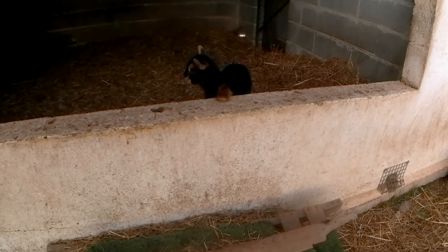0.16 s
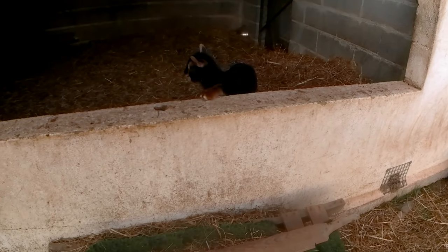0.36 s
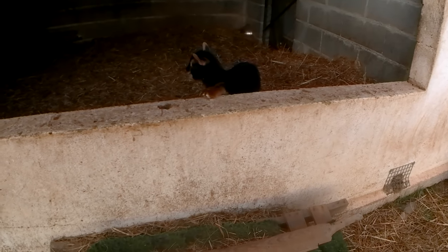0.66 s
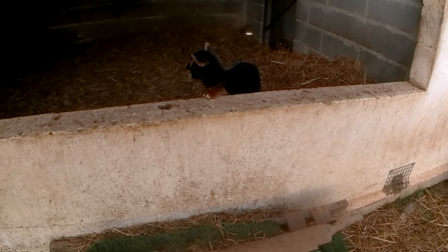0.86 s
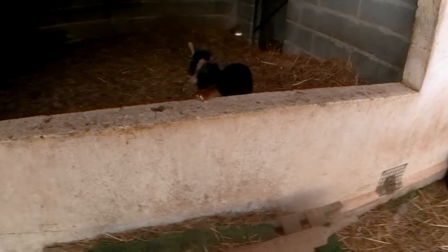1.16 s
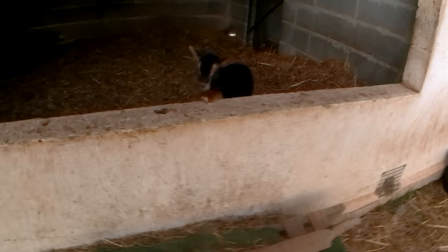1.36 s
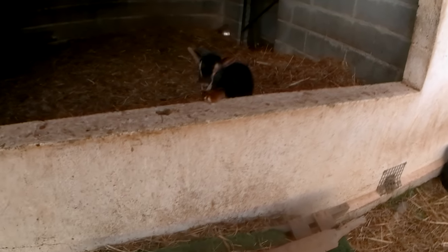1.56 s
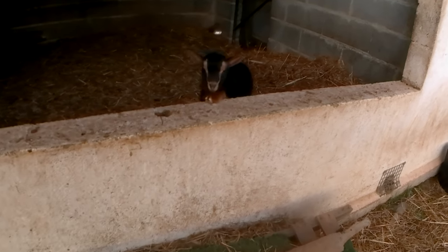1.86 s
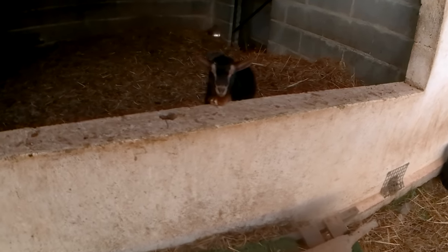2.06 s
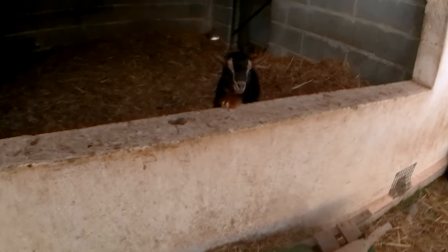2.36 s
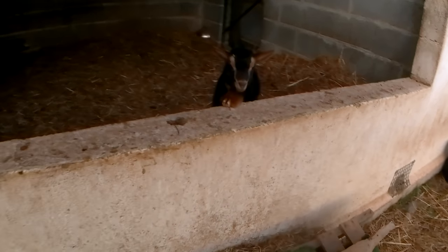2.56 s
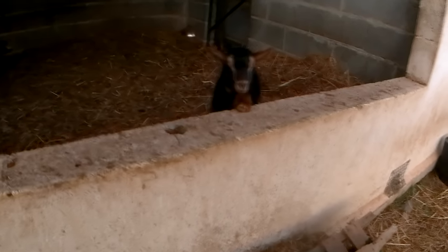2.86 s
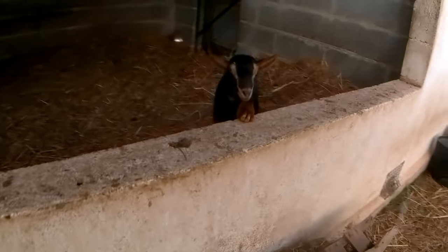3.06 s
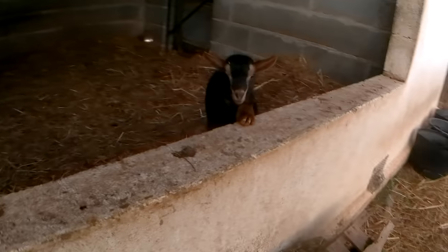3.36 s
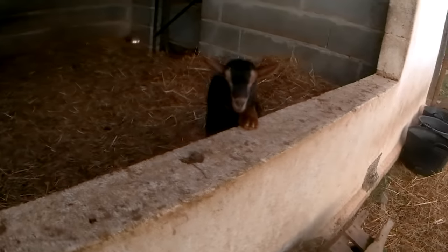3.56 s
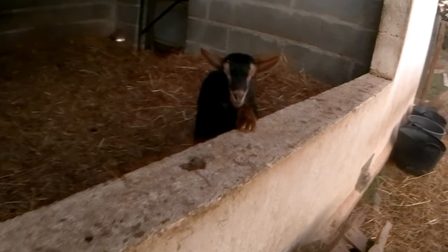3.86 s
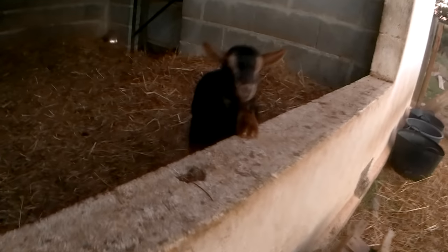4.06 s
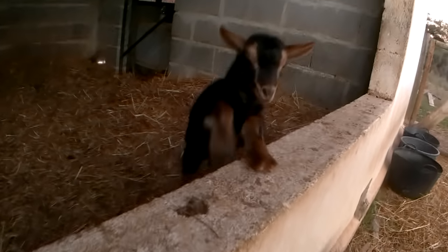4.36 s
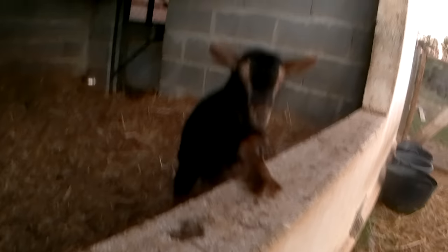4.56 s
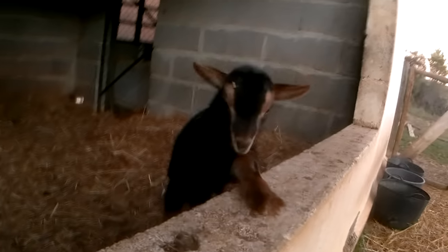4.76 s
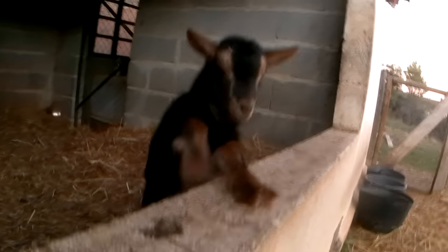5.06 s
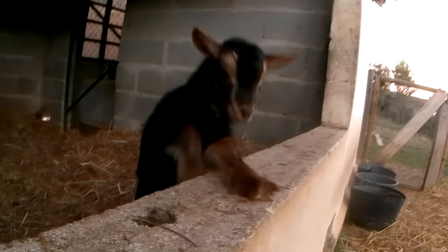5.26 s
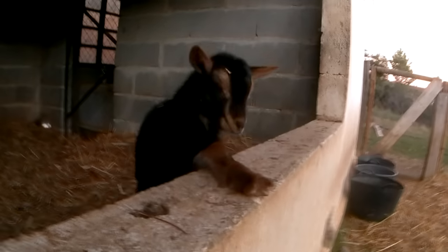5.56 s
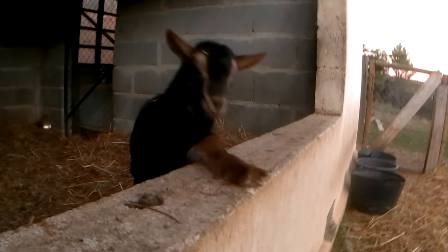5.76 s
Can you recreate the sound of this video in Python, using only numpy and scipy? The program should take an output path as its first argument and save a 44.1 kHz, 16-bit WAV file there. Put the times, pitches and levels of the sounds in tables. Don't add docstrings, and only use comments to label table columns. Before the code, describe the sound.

A goat kid moves about a straw-bedded block pen, its dull sheet-metal neck bell clanking loosely while hooves knock hollowly. One short, quavering bleat comes near two seconds. After a sparser stretch, the bell clatters densely and loudest around four seconds as hooves slide on the wall top, then continues more loosely. Low handling bumps and rumble sit close to a dull, slightly overloaded microphone.

```python
import sys
import numpy as np
from scipy import signal
from scipy.io import wavfile
from scipy.ndimage import uniform_filter1d, minimum_filter1d

SR = 44100
rng = np.random.default_rng(int(sys.argv[2]) if len(sys.argv) > 2 else 0)


def makeup_ratio(level_db):
    decades = np.asarray(level_db, float) / 20
    return 10 ** decades


def master_out(mix):
    frames = np.transpose(np.atleast_2d(mix))
    ceiling = np.clip(frames, -1, 1)
    pcm = np.round(ceiling * 32767).astype(np.int16)
    wavfile.write(sys.argv[1], SR, pcm)


N = 261072

# (time [s], steps and hands near the microphone [dB], stirring in the straw [dB])
MOVEMENT = [(0, 0, -2), (.45, 2, -1.2), (.9, 3.5, -9.5), (1.2, 5.5, -5.5), (1.45, 2.5, 0), (1.75, 3, -3.5),
            (2.1, -5.5, 6.5), (2.3, 4, 9.5), (2.55, 3, -1.5), (3.0, 0.5, -2), (3.3, -1.3, 1), (3.75, 2, 3),
            (4.0, 1, 12.5), (4.3, -2, 9.5), (4.9, 0, 1), (5.35, 7, -0.5), (5.65, 1, -0.5), (5.92, 3, 1.5)]
# (frequency [Hz], density [dB per Hz])
RUMBLE_SPECTRUM = [(18, 4), (45, -2), (80, -3), (130, -8), (200, -13.5)]
SHUFFLE_SPECTRUM = [(130, -3), (250, -2), (500, -8), (900, -10.5), (1300, -16.5), (1800, -22.5)]
STRAW_SPECTRUM = [(900, 1), (1300, 5), (1700, -4.5), (2200, -2), (2700, -1.5), (3100, -23.5), (3400, -26)]
FINE_STRAW_SPECTRUM = [(2900, -12.5), (3500, -1), (4100, -3.5), (4700, -8.5), (5200, -10), (6200, -15),
                       (7400, -29.5)]
RUMBLE_DB, SHUFFLE_DB, STRAW_DB, FINE_DB = -34, -36.5, -43, -58
RUMBLE_FOLLOWS, FINE_FOLLOWS = 0.56, 0.6

# (time [s], peak [dB], t60 [s])
THUDS_NEAR_MIC = [(.37, -48, 0.031), (0.275, -5, 0.0087), (.576, -38, 0.29), (0.65, -26, 0.088),
                  (0.943, -37.5, 0.18), (.957, -24, 0.03), (1.286, -24, 0.12), (1.461, -27, 0.099),
                  (1.837, -27.5, 0.11), (2.53, -35, 0.1), (2.545, -25.5, 0.046), (3.13, -27, 0.066),
                  (3.401, -30.5, 0.065), (5.03, -25, 0.052), (5.587, -23.5, 0.082), (5.616, -33, 0.047),
                  (5.819, -13, 0.013)]
THUD_HZ, THUD_HZ_PER_S = 54, 76

# (time [s], peak [dB], brightness [dB], t60 [s])
STALK_SNAPS = [(0.287, -32.5, -4.5, 0.029), (0.3006, -30, -3.5, 0.013), (0.307, -38, -5, 0.03),
               (2.72, -35, -7.5, 0.017), (0.4007, -43.5, -1, 0.01), (1.3745, -48, -29, 0.066),
               (3.4332, -42, -38, 0.12), (4.661, -39, -14, 0.023), (4.7616, -59, -20.5, 0.036),
               (5.021, -37, -15.5, 0.017), (5.171, -22.5, -17, 0.0088)]
# (time [s], peak [dB], weight [dB], t60 [s])
HORN_SCUFFS = [(.437, -61, 9, 0.031), (0.5932, -44.5, -1.5, 0.054), (.6144, -54, 19, 0.11),
               (.8294, -57, 25.5, 0.039), (.976, -46, 9, 0.096), (1.0086, -52.5, 8, 0.21),
               (1.613, -40, 9, 0.036), (2.3485, -35, 8, 0.037), (2.642, -35, 5, 0.017),
               (2.718, -42, 7, 0.036), (2.7266, -36, 5.5, 0.11), (3.7716, -46, 16.5, 0.067),
               (5.8164, -39.5, 9.5, 0.027), (1.213, -48.5, 8, 0.068), (1.044, -48.5, 12, 0.041),
               (3.134, -53, 5, 0.053), (3.488, -46, 3, 0.029)]
STALK_WEIGHT_DB, SCUFF_BRIGHT_DB = 0.5, -34

# (time [s], length [s], level [dB])
HOOF_SLIDES = [
    (3.778, 0.31, -30),
    (4.244, 0.069, -31.5),
    (4.455, 0.042, -30),
]
# (frequency [Hz], density [dB per Hz])
GRIT_SPECTRUM = [(480, -5), (650, 11), (1100, 3), (1700, -14.5), (2200, -0.5), (2700, -2.5), (3300, -15),
                 (5400, -18.5), (7400, -48)]
SLIDE_GRIPS_DB_PER_S, SLIDE_FADES_DB_PER_S, SLIDE_START_DB = 131, 73.5, -8

# (time [s], peak [dB], pitch [Hz], t60 [s])
HOOF_KNOCKS = [(0.277, -20, 277, 0.021), (0.617, -12, 300, 0.082), (0.662, -4.5, 293, 0.024),
               (0.719, -18, 322, 0.083), (1.031, -10, 340, 0.036), (1.173, -18.5, 367, 0.11),
               (1.369, -20, 215, 0.024), (1.457, -6.5, 179, 0.048), (2.348, -19, 487, 0.26),
               (2.384, -21, 393, 0.14), (2.457, -16.5, 325, 0.056), (2.52, -22, 224, 0.075),
               (2.644, -14.5, 656, 0.058), (2.718, -9.5, 667, 0.07), (2.742, -10, 616, 0.037),
               (3.064, -7, 360, 0.016), (3.588, -12, 575, 0.037), (3.791, -27, 350, 0.061),
               (3.842, -21.5, 322, 0.18), (3.91, -32, 573, .2), (4.163, -17.5, 364, 0.12),
               (4.296, -22, 223, 0.29), (4.183, -19.5, 330, 0.1), (5.278, -12.5, 205, 0.039),
               (5.276, -9, 438, 0.096), (5.31, -17, 497, 0.13), (5.433, -25, 318, 0.11),
               (5.614, -20, 228, 0.074), (5.831, -16, 173, 0.13), (1.121, -22, 340, 0.035),
               (1.376, -22, 420, .04), (1.548, -22.5, 520, 0.085), (1.62, -22.5, 420, 0.067),
               (1.708, -22.5, 450, .06), (3.135, -29.5, 600, 0.086), (3.26, -27, 600, 0.094),
               (4.297, -21.5, 600, 0.072), (4.575, -25.5, 450, 0.044)]

# (middle [s], half length [s], level [dB])
CLAPPER_DRAGS = [
    (1.17, 0.054, -56.5),
    (2.5, 0.073, -56),
    (1.4, 0.04, -58),
    (0.062, 0.056, -57),
]
# (time [s], pitch [Hz], peak [dB], ring [s])
EDGE_GLINTS = [(.493, 5947, -56, .04), (.493, 4330, -49, .035), (.5, 5120, -60, .05),
               (.555, 4280, -56.5, .03), (.596, 5947, -63, .09), (.64, 3860, -57, .12),
               (3.772, 5947, -52, .02), (3.772, 4350, -52.5, .015), (3.83, 3790, -44.5, .045),
               (3.852, 4859, -43.5, .03), (3.856, 4340, -53.5, .025), (4.013, 5947, -40, .06),
               (4.07, 5900, -57, .075), (4.013, 4830, -38, .115), (3.668, 4859, -50.5, 0.066),
               (.8, 3800, -62, 0.11), (4.455, 3816, -48.5, 0.042), (4.215, 4360, -51, .045),
               (4.3, 4859, -49, .035), (4.52, 3760, -48.5, .1), (4.73, 3816, -55.5, .11),
               (5.698, 4350, -56, .04)]

# (time [s], peak [dB], pitch [Hz], beats with its twin [per s], ring [s])
FULL_BLOWS = [(.172, -7.5, 848.4, 13, 0.046), (.495, -5, 855, 10, 0.064), (.592, -12, 808, 37.5, 0.1),
              (.788, -16.5, 843, 24, 0.078), (1.09, -27, 852, 9.5, 0.21), (1.214, -16.5, 852, -6, 0.053),
              (1.568, -23.5, 838.5, 3.5, 0.048), (1.716, -17.5, 874, 30, 0.061),
              (2.422, -23, 865, -27, 0.051), (3.047, -17, 837, -2, 0.044), (3.533, -5.5, 827, 37.5, 0.067),
              (3.666, -4.5, 843, 28.5, 0.018), (3.777, -2, 833, 8.5, 0.078), (3.869, 0, 858, 10, 0.018),
              (4.017, 0.5, 852, 42, 0.05), (4.283, -5, 844, 16.5, 0.023), (4.451, -2.5, 843.5, 16, 0.016),
              (4.728, -9, 844, -4, 0.073), (4.825, -5, 834, 44, 0.066), (5.106, -13, 848.6, 24.5, 0.11),
              (5.219, -5, 869, 24.5, 0.019), (5.701, -8, 869, -24, 0.031)]
# (time [s], peak [dB], pitch [Hz], beats [per s], ring [s])
GLANCING_TOUCHES = [(.05, -34, 840, 5, 0.043), (0.078, -15.5, 850, -4, 0.042), (.22, -22, 846.4, 5, 0.047),
                    (.316, -24, 846, 31.5, 0.072), (.535, -1.5, 851.5, 6, 0.038),
                    (.612, -8.5, 843.7, -9, 0.048), (.664, -12, 852.5, 13.5, 0.035),
                    (0.713, -14, 843, 20.5, 0.045), (.82, -20, 857, 5, 0.058),
                    (.897, -22.5, 844, 16.5, 0.089), (1.312, -19, 848.6, 16.5, 0.075),
                    (1.872, -20, 876, -36, 0.027), (2.871, -27.5, 842, 5, 0.063),
                    (3.349, -17.5, 841.4, 17.5, 0.068), (3.684, -4, 830, 10.5, 0.011),
                    (3.713, -6.5, 830, 8, 0.026), (3.889, -2, 854, 11, 0.024), (3.921, -24, 845, 22, 0.016),
                    (3.946, -9, 849, 18, 0.072), (4.055, -6.5, 856, 8, 0.022), (4.09, -5, 844.3, 42, 0.066),
                    (4.302, -7.5, 867, 18, 0.024), (4.221, -4.5, 841.6, 40, 0.054),
                    (4.176, -18.5, 839, 12, 0.027), (4.332, -24, 860, 2.5, .07),
                    (4.51, -22, 870, 4, 0.0088), (4.479, -7.5, 851, -6.5, 0.029),
                    (4.535, -12.5, 830, 16.5, 0.034), (4.595, -14.5, 829, -2.5, 0.021),
                    (4.886, -17, 876, 11, 0.013), (4.912, -21.5, 849, 22, 0.065),
                    (4.98, -18.5, 839, 17, 0.04), (5.07, -17, 838, 28.5, 0.1), (5.287, -10, 855, 13, 0.038),
                    (5.329, -9, 850.3, 10, 0.034), (5.39, -20, 851, 29, 0.08)]
# (time [s], rise [s])
DRAGGED_BLOWS = [(.082, 0.0039), (1.214, 0.003), (3.534, 0.0049), (3.778, 0.018), (4.017, 0.0055),
                 (3.869, .007), (3.047, .007), (3.349, 0.0051), (4.283, 0.0032), (4.48, 0.011),
                 (4.728, 0.0056), (4.825, 0.0094), (5.222, 0.0092), (.535, 0.019), (.612, 0.0073),
                 (3.712, 0.0083), (3.946, 0.011), (5.33, 0.0066), (.712, 0.0092)]
# (time [s], peak [dB], lean to one of two rim modes [dB], hardness [dB], freedom from the coat [0-1])
UPPER_BLOWS = [(.172, -50.5, -2, -16, 0.7), (.492, -31, -15.5, -18.5, 0.83), (.612, -49, -8, -24.5, 0.4),
               (.636, -47, -2, -24, 0.7), (.7851, -44, -10, -34, 0.84), (1.075, -51, -10, -25, 0.94),
               (1.2141, -44, -5.5, -15.5, 0.07), (1.5559, -47, -20, -17, .9), (1.715, -40, -32, -40, 0.4),
               (2.4159, -48, -18, -29, 0.74), (3.0484, -46.5, -7, -41.5, .95),
               (3.5334, -35.5, -15, -20, 0.37), (3.6674, -44, -4.5, -8.5, 0.6),
               (3.772, -27.5, -12.5, -22.5, 0.3), (3.8744, -35, -5.5, -3, 0.5),
               (4.014, -30.5, 0, -5.5, 0.57), (4.136, -38, 19, -24, 0.8), (4.2824, -37.5, 5, -12, 0.06),
               (4.446, -33.5, 6.5, -19, 0.49), (4.726, -37.5, 13.5, -16.5, 0.06),
               (4.8234, -39.5, 1, -31, 0.3), (5.1054, -44.5, 7, -28, 0.07), (5.216, -42.5, -3.5, -15, 0.7),
               (5.293, -44.5, -2.5, -16.5, 0.8), (5.6984, -35, 8, -11, 0.14)]
# (pitch [Hz], family [index], level [dB])
UPPER_MODES = [
    (1983, 0, 0),
    (2174, 1, 3),
    (3779, 4, 2),
    (3816, 5, 2),
    (4859, 3, 0),
]
CROWN_DB, CROWN_PER_LEAN = -12.5, 1.5
SHOULDER_EVEN_DB = -11
TWIN_SHARE_PER_BEAT = 0.012
TWIN_FADES_S = 0.038
TWINS_AGREE_S = 0.0088

# (time [s], pitch [Hz], level [dB])
BLEAT_LINE = [
    (1.795, 353.6, -43),
    (1.818, 424, -23.5),
    (1.848, 581.3, -29.5),
    (1.955, 578, -23.5),
    (2.05, 583, -14),
    (2.24, 601.6, -11.5),
    (2.273, 528, -19),
    (2.3, 407, -18),
    (2.322, 373, -45),
]
# (time [s], half length [s], depth [0-1])
VOICE_CATCHES = [
    (2.0675, .002, .95),
    (2.0885, .0015, .9),
    (2.162, .003, .75),
    (2.195, .002, .85),
    (2.272, .003, .5),
]
# (frequency [Hz], width [Hz], level [dB])
NOSE_MODES = [(487, 380, 3), (1130, 310, -4.5), (2390, 170, -13.5), (2910, 250, -27), (4150, 280, -25.5),
              (6520, 2500, -34.5)]
MOUTH_MODES = [(1216, 350, 4.5), (2330, 490, -18.5), (3610, 520, -31.5), (4620, 400, -26.5),
               (6060, 980, -38)]
LIPS_PART, MOUTH_OPENS_S, MOUTH_TAKES_S = 0.073, 1.972, 0.0096
QUAVER_HZ, QUAVER_TOP_S, QUAVER_CALMS_S = 11.4, 2.036, 2.11
QUAVER_DEPTH_HZ, QUAVER_DB = 20.9, 3.5
PUSH_LAGS_S = 0.007

# (delay [s], level [dB])
WALL_ECHOES = [(.011, -8.5), (.023, -6.5), (.037, -13.5), (.058, -20.5), (0.082, -23.5)]
# (middle [s], half length [s], above [Hz])
TREBLE_DIPS = [
    (.278, .008, 3000),
    (.457, .011, 4600),
    (.486, .005, 4600),
    (.586, .006, 5500),
    (1.85, .006, 2800),
    (1.894, .006, 4600),
    (3.763, .007, 4600),
    (3.867, .005, 5300),
    (4.12, .009, 3200),
    (4.518, .005, 3000),
]
KNEE, HEADROOM = 0.46, 0.34
OFFSET, SQUEEZE_FROM_DB = -0.27, -10.5
BEND = 0.058
HISS_DB = -87


def in_time(rows):
    s, *columns = np.transpose(rows)
    return [np.interp(np.arange(N) / SR, s, c) for c in columns]


def rms_one(x):
    return x / np.sqrt(np.mean(x ** 2) + 1e-20)


def drift(rate_hz):
    knots = rng.standard_normal(int(N / SR * 40) + 400)
    return np.interp(np.arange(N) / SR * rate_hz, np.arange(len(knots)), knots)


def band(x, low_hz, high_hz):
    return signal.sosfilt(signal.butter(2, [low_hz, high_hz], "band", fs=SR, output="sos"), x)


def add(out, s, sound):
    at = int(s * SR)
    out[at:at + len(sound)] += sound[:N - at]


def coloured(spectrum, patchy_db, crackle_db):
    hz, level_db = np.transpose(spectrum)
    edges_hz = np.geomspace(hz[0], hz[-1], num=11)
    together, swell = drift(11), drift(2.76)
    crackle = makeup_ratio(crackle_db * rng.standard_normal((2, N // 32 + 1))).repeat(32, axis=1)[:, :N]
    grains = rng.standard_normal((2, N)) * crackle
    out = 0
    for k, (low_hz, high_hz) in enumerate(zip(edges_hz, edges_hz[1:])):
        gain_db = np.interp(np.log(low_hz * high_hz) / 2, np.log(hz), level_db)
        gain_db = gain_db + patchy_db * (together + drift(18) + swell)
        out = out + makeup_ratio(gain_db) * band(grains[k % 2], low_hz, high_hz)
    return rms_one(signal.sosfilt(signal.butter(6, 7300, fs=SR, output="sos"), out))


def rustle():
    near_db, stir_db = in_time(MOVEMENT)
    out = makeup_ratio(RUMBLE_DB + RUMBLE_FOLLOWS * near_db) * coloured(RUMBLE_SPECTRUM, 4.5, -4.0)
    out += makeup_ratio(SHUFFLE_DB + near_db) * coloured(SHUFFLE_SPECTRUM, 2.5, 6.0)
    out += makeup_ratio(STRAW_DB + stir_db) * coloured(STRAW_SPECTRUM, 3.0, 6.0)
    out += makeup_ratio(FINE_DB + FINE_FOLLOWS * stir_db) * coloured(FINE_STRAW_SPECTRUM, 3.0, 2.0)
    return out


def thuds():
    out, t = np.zeros(N), np.arange(int(0.25 * SR)) / SR
    for s, level_db, t60 in THUDS_NEAR_MIC:
        hz = THUD_HZ + THUD_HZ_PER_S * t60
        push = np.sin(2 * np.pi * hz * (t + 0.0033 * (1 - np.exp(-t / 0.008))))
        add(out, s, makeup_ratio(level_db + 15.0 - 60 * t / t60) * push * (1 - np.exp(-t / 0.005)))
    return out


def snaps():
    out, t = np.zeros(N), np.arange(int(0.2 * SR)) / SR
    rows = [(s, level_db, STALK_WEIGHT_DB, top_db, t60) for s, level_db, top_db, t60 in STALK_SNAPS]
    rows += [(s, level_db, low_db, SCUFF_BRIGHT_DB, t60) for s, level_db, low_db, t60 in HORN_SCUFFS]
    for s, level_db, low_db, top_db, t60 in rows:
        white = rng.standard_normal(len(t))
        crack = rms_one(band(band(white, 1200, 3100), 1200, 3100))
        crack += makeup_ratio(low_db) * rms_one(band(band(white[::-1], 640, 1400), 300, 2400))
        crack += makeup_ratio(top_db + 2) * rms_one(band(band(white, 3700, 5400), 3000, 7500))
        add(out, s, makeup_ratio(level_db + 12.0 - 60 * t / t60) * crack * (1 - np.exp(-t / 0.0034)))
    return out


def slides():
    s, length, level_db = np.transpose(HOOF_SLIDES)[:, :, None]
    t = np.arange(N) / SR - s
    shape_db = np.minimum(SLIDE_START_DB + SLIDE_GRIPS_DB_PER_S * t, 0)
    shape_db = shape_db - SLIDE_FADES_DB_PER_S * np.maximum(t - length, 0)
    force = np.max(makeup_ratio(level_db + shape_db) * np.clip(t / 0.012, 0, 1), axis=0)
    grit = coloured(GRIT_SPECTRUM, patchy_db=2.0, crackle_db=5.5)
    horn_ring = band(band(grit, 2250, 2850), 2250, 2850)
    return force * (grit + 2.1 * horn_ring)


def knocks():
    out, t = np.zeros(N), np.arange(int(0.2 * SR)) / SR
    for s, level_db, hz, t60 in HOOF_KNOCKS:
        white = rng.standard_normal(len(t))
        body = rms_one(band(band(white, hz * 0.64, hz * 1.304), hz * 0.86, hz * 2.7))
        add(out, s, makeup_ratio(level_db + 1.5 - 60 * t / t60) * body * (1 - np.exp(-t / 0.0011)))
    return out


def chafes():
    s, half, level_db = np.transpose(CLAPPER_DRAGS)[:, :, None]
    force = np.sum(makeup_ratio(level_db) * np.exp(-((np.arange(N) / SR - s) / half) ** 4), axis=0)
    return force * rms_one(band(band(rng.standard_normal(N), 3440, 4120), 3500, 4200))


def glints():
    out, t = np.zeros(N), np.arange(int(0.2 * SR)) / SR
    waver = makeup_ratio(2.5 * drift(36))
    for s, hz, level_db, ring in EDGE_GLINTS:
        held = makeup_ratio(level_db - 23 * t) * np.exp(-(t / ring) ** 4)
        add(out, s, held * (1 - np.exp(-t / 0.0015)) * np.sin(2 * np.pi * hz * t))
    return out * waver


def low_pair():
    out, t = np.zeros(N), np.arange(int(0.4 * SR)) / SR
    rattle = rms_one(band(rng.standard_normal(N), 810, 910))
    clanks = sorted(FULL_BLOWS + GLANCING_TOUCHES)
    starts = [row[0] for row in clanks] + [N / SR]
    for (s, level_db, low_hz, beats_hz, ring), following in zip(clanks, starts[1:]):
        share, high_hz = min(TWIN_SHARE_PER_BEAT * abs(beats_hz), 0.5), low_hz + beats_hz
        rise = max([0.004] + [slow for at, slow in DRAGGED_BLOWS if abs(at - s) < 0.01])
        scoop = 2 * np.pi * 0.17 * (1 - np.exp(-t / 0.0063))
        pair = (1 - share) * np.sin(2 * np.pi * low_hz * t + scoop)
        twin = np.sin(2 * np.pi * (high_hz * t - beats_hz * TWINS_AGREE_S) + scoop)
        pair += share * np.exp(-t / TWIN_FADES_S) * twin
        pair += 0.1 * rattle[int(s * SR / 2):][:len(t)]
        pair += 0.12 * np.exp(-t / 0.012) * np.sin(2 * np.pi * 990 * t)
        held = 0.67 * np.exp(-(t / ring) ** 5.8) + 0.27 * np.exp(-t / 0.07)
        stopped = np.clip((following - s + 0.014 - t) / 0.012, 0, 1)
        onset = 1 - np.exp(-(t / rise) ** 1.5)
        add(out, s - 0.003, makeup_ratio(level_db) * pair * held * stopped * onset)
    return out


def upper_modes():
    out, t = np.zeros(N), np.arange(int(0.4 * SR)) / SR
    turns = rng.random((len(UPPER_BLOWS), len(UPPER_MODES)))
    flicker = makeup_ratio(3.5 * np.array([drift(55) for mode in UPPER_MODES]))
    starts = [row[0] for row in UPPER_BLOWS] + [N / SR]
    for row, blow_turns, following in zip(UPPER_BLOWS, turns, starts[1:]):
        s, force_db, lean_db, hard_db, free = row
        stopped = np.clip((following - s + 0.011 - t) / 0.0047, 0, 1) * np.clip((0.4 - t) / 0.11, 0, 1)
        shoulder_db = force_db + hard_db
        family_db = [force_db - max(lean_db, 0),
                     force_db + min(lean_db, 0),
                     shoulder_db,
                     shoulder_db + CROWN_DB + CROWN_PER_LEAN * min(lean_db, 0),
                     shoulder_db - 1.8 * max(lean_db - SHOULDER_EVEN_DB, 0),
                     shoulder_db + 1.7 * min(lean_db - SHOULDER_EVEN_DB, 0)]
        for (hz, family, level_db), turn, facing in zip(UPPER_MODES, blow_turns, flicker):
            ring = 0.41 * free * 2000 / hz
            decay = 0.75 * np.exp(-(t / ring) ** 2.2) + 0.37 * np.exp(-t / 0.14)
            tail = makeup_ratio(family_db[family] + level_db - 20 * t) * decay * (1 - np.exp(-t / 0.00047))
            heard = np.resize(facing[int(s * SR):], len(t)) * stopped
            add(out, s, tail * heard * np.sin(2 * np.pi * (hz * t + turn)))
    return out


def bell():
    clanks = low_pair() + upper_modes()
    sway = np.arange(N) + 7.4 * drift(14)
    return np.interp(sway, np.arange(N), clanks) * makeup_ratio(drift(30))


def tract(modes, hz):
    return np.sqrt(sum(makeup_ratio(level_db) ** 2 / (1 + (2 * (hz - top_hz) / width_hz) ** 2) ** 1.83
                       for top_hz, width_hz, level_db in modes))


def bleat():
    pitch, level_db = in_time(BLEAT_LINE)
    t = np.arange(N) / SR
    opening = LIPS_PART * np.clip((t - 1.84) / 0.077, 0, 1)
    opening = opening + np.clip((t - MOUTH_OPENS_S) / MOUTH_TAKES_S, 0, 1)
    taut = np.clip((pitch - 540) / 45, 0, 1)
    swing = taut * np.cos(2 * np.pi * QUAVER_HZ * (t - QUAVER_TOP_S))
    swing = taut - 2 * taut * ((1 - swing) / 2) ** 1.1
    push = taut * np.cos(2 * np.pi * QUAVER_HZ * (t - QUAVER_TOP_S - PUSH_LAGS_S))
    level_db = level_db + QUAVER_DB * push * (0.81 + 0.094 * np.tanh((t - QUAVER_CALMS_S) / 0.02))
    depth_hz = QUAVER_DEPTH_HZ * (0.75 - 0.3 * np.tanh((t - QUAVER_CALMS_S) / 0.033))
    pitch = pitch + depth_hz * swing + 2.6 * drift(70)
    for s, half, depth in VOICE_CATCHES:
        pitch = pitch - 11.4 * depth * np.exp(-((t - s) / 0.0063) ** 2)

    live = slice(int(BLEAT_LINE[0][0] * SR), int(BLEAT_LINE[-1][0] * SR))
    t, pitch, push, opening = t[live], pitch[live], push[live], np.clip(opening[live], 0, 1)
    phase = 2 * np.pi * np.cumsum(pitch) / SR
    order = np.arange(1, 21)[:, None]
    gains = (1 - opening) * tract(NOSE_MODES, order * pitch) + opening * tract(MOUTH_MODES, order * pitch)
    gains *= makeup_ratio(-0.05 * order * np.maximum(590 - pitch, 0) ** 0.52)
    gains[5:] *= np.clip((t - 1.9) / 0.035, 0, 1)
    gains[3:] *= makeup_ratio(3 * np.array([drift(39)[live] for k in order[3:]]))
    gains /= np.sqrt(np.sum(gains ** 2, axis=0) / 2)
    for s, half, depth in VOICE_CATCHES:
        width = np.where(t < s, 1.6 * half, 0.5 * half)
        gains[1:] *= 1 - depth * np.exp(-((t - s) / width) ** 2)
    gains[0] *= makeup_ratio(-0.7 * QUAVER_DB * push * opening)
    voice = np.sum(gains * np.sin(order * phase + 0.56 * order ** 2), axis=0)

    air, puffs = rng.standard_normal(len(voice)), 1 + np.cos(phase)
    breath = rms_one(band(band(air, 1500, 4600), 1500, 4600)) * puffs
    leaks = 1 + sum(5.0 * depth * np.exp(-((t - s) / 0.0056) ** 2) for s, half, depth in VOICE_CATCHES)
    breath += makeup_ratio(-11.5) * leaks * rms_one(band(air[::-1], 4800, 9500)) * puffs
    out = np.zeros(N)
    out[live] = (voice + makeup_ratio(-40) * breath) * makeup_ratio(level_db[live])
    return out


def pen(x, wet_db):
    out, dull = x.copy(), signal.lfilter([0.4], [1, -0.6], x)
    for delay, level_db in WALL_ECHOES:
        add(out, delay, makeup_ratio(level_db + wet_db) * dull)
    return out


def squeeze(x):
    peak = -minimum_filter1d(-np.abs(x), size=1500)
    return uniform_filter1d(np.minimum(1, makeup_ratio(SQUEEZE_FROM_DB) / (peak + 1e-9)), size=1300)


def treble_dips(x):
    t = np.arange(N) / SR
    for s, half, above_hz in TREBLE_DIPS:
        near = slice(int((s - 0.05) * SR), int((s + 0.05) * SR))
        high_pass = signal.butter(6, above_hz, "high", fs=SR, output="sos")
        top = np.zeros_like(x)
        top[:, near] = signal.sosfiltfilt(high_pass, x[:, near]) * np.exp(-((t[near] - s) / half) ** 4)
        x = x - 0.82 * top
    return x


def scene():
    background = rustle()
    goat = pen(snaps(), wet_db=-15.5) + pen(knocks(), wet_db=-10.5) + glints()
    goat += pen(bell(), wet_db=-6.5) + pen(bleat(), wet_db=-8.0)
    return (background * squeeze(goat) ** 0.069 + thuds() + slides() + chafes() + goat)[None]


def roll_off(x):
    return signal.sosfilt(signal.butter(12, 10600, fs=SR, output="sos"), x)


def record(dry):
    peak = -minimum_filter1d(-np.abs(dry), size=800)
    limited = dry * uniform_filter1d(np.minimum(1, 0.86 / (peak + 1e-9)), size=400)
    shifted = limited + BEND * limited ** 2 + OFFSET * squeeze(dry)
    excess = np.maximum(-KNEE - shifted, 0)
    rounded = shifted + excess - HEADROOM * np.tanh(excess / HEADROOM)
    start = rounded[:, :1]
    moving = rounded - start
    steep = signal.sosfilt(signal.cheby2(8, 40, 5600, fs=SR, output="sos"), moving)
    hissing = moving + makeup_ratio(HISS_DB) * rng.standard_normal(dry.shape)
    leak = signal.sosfilt(signal.butter(4, [4500, 8600], "band", fs=SR, output="sos"), hissing)
    mix = treble_dips(start + steep + makeup_ratio(-9.0) * leak)
    return roll_off(mix)


dry = scene()
out = record(dry)
master_out(out)
```